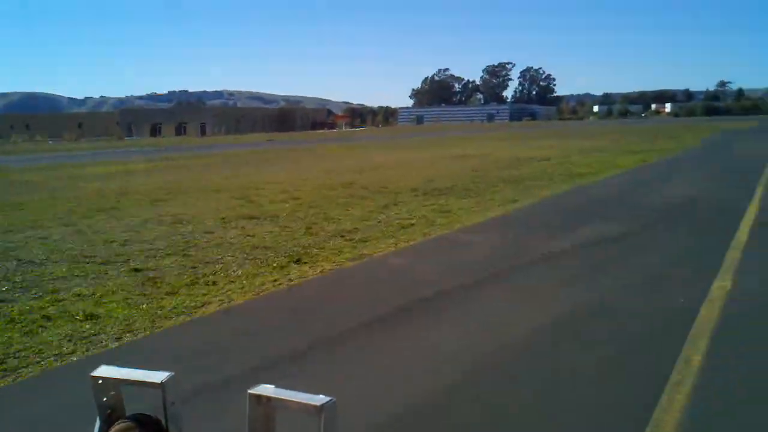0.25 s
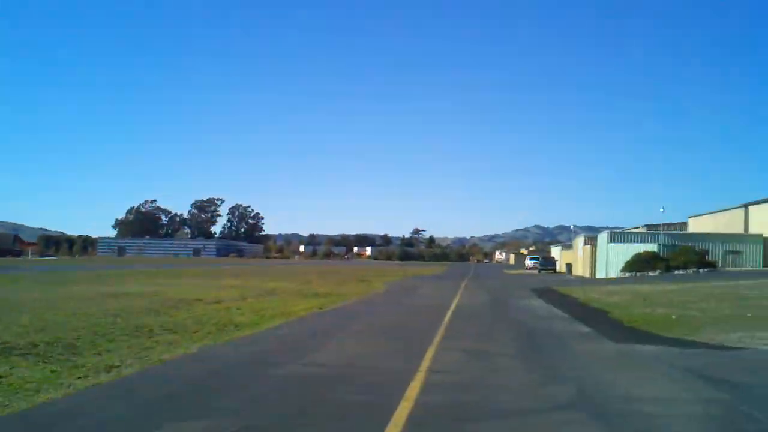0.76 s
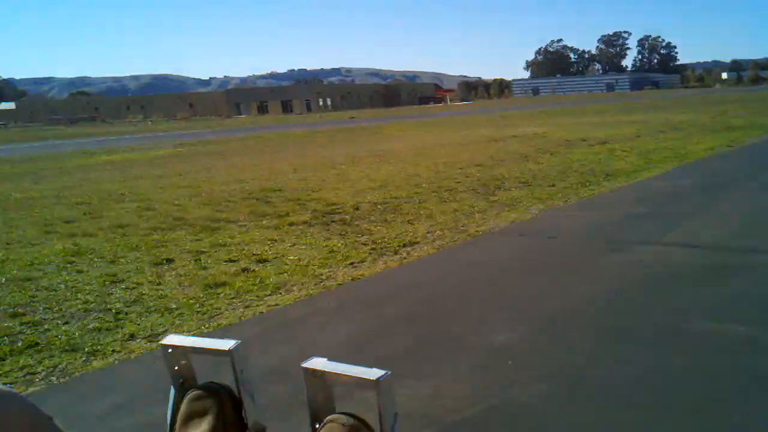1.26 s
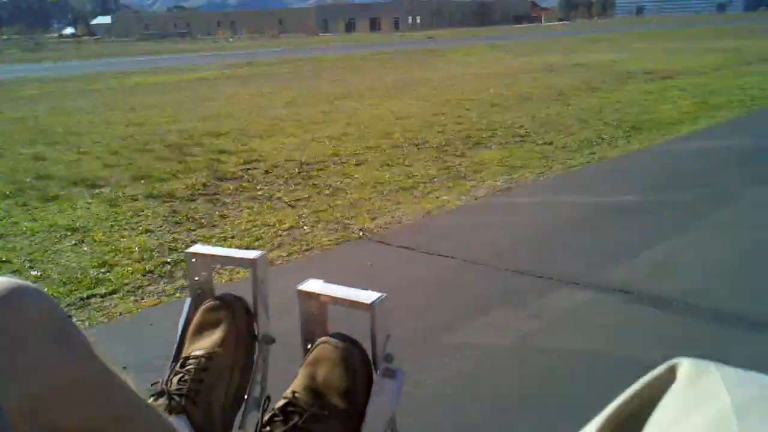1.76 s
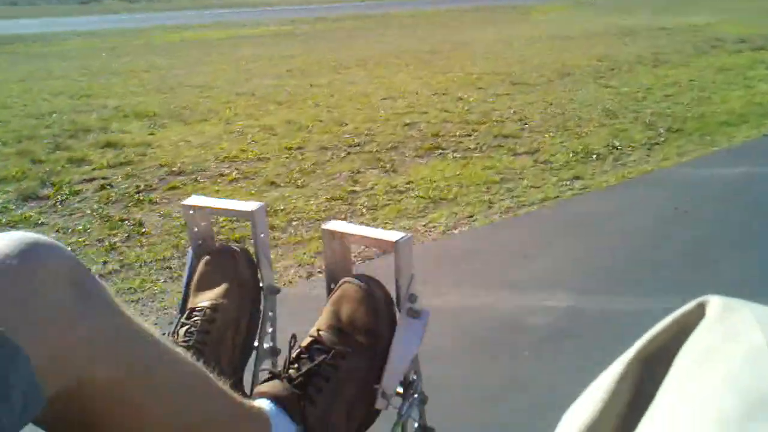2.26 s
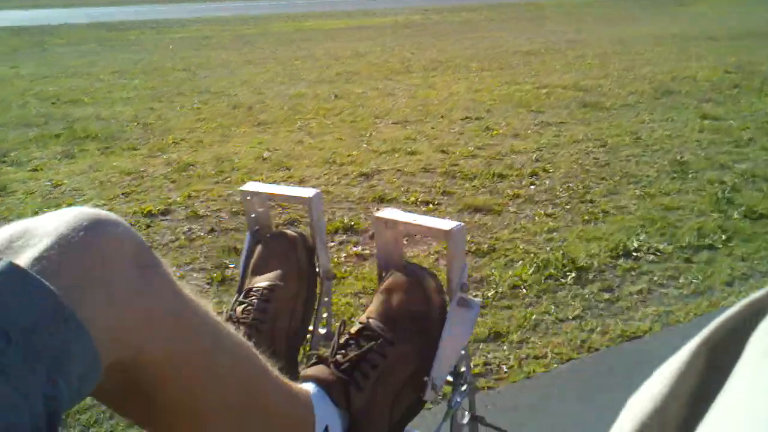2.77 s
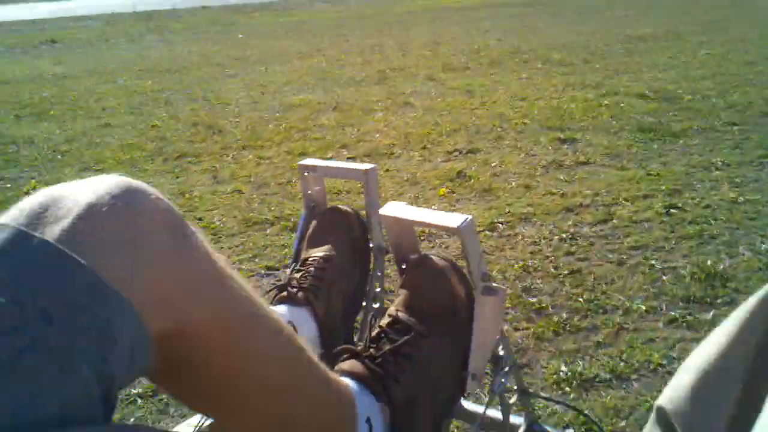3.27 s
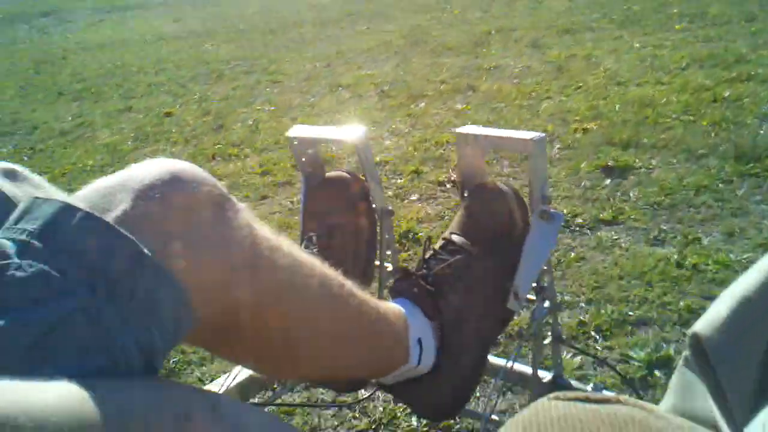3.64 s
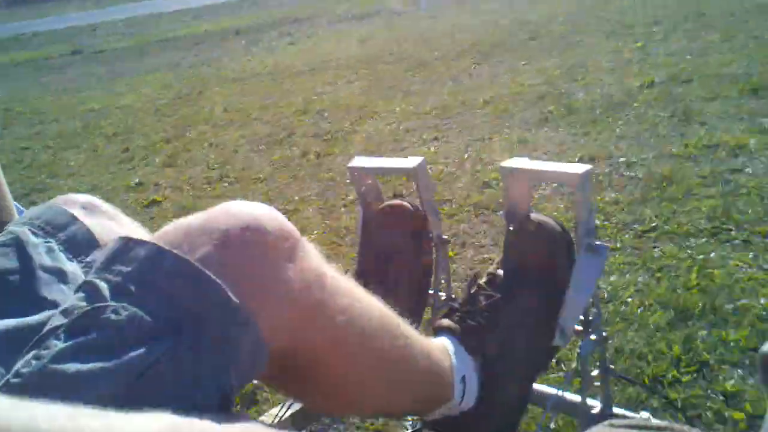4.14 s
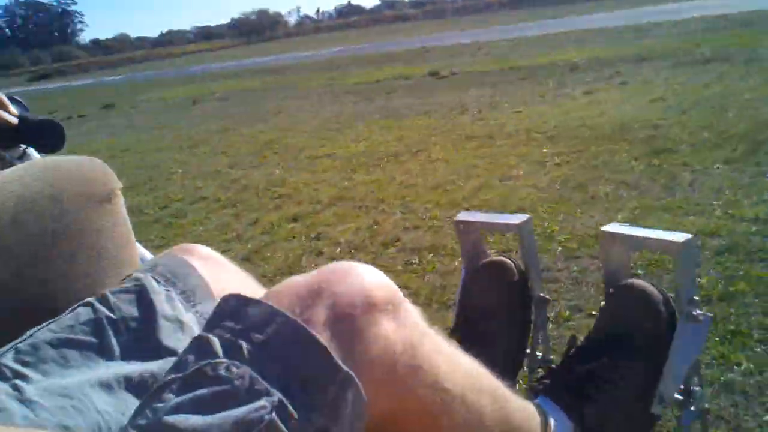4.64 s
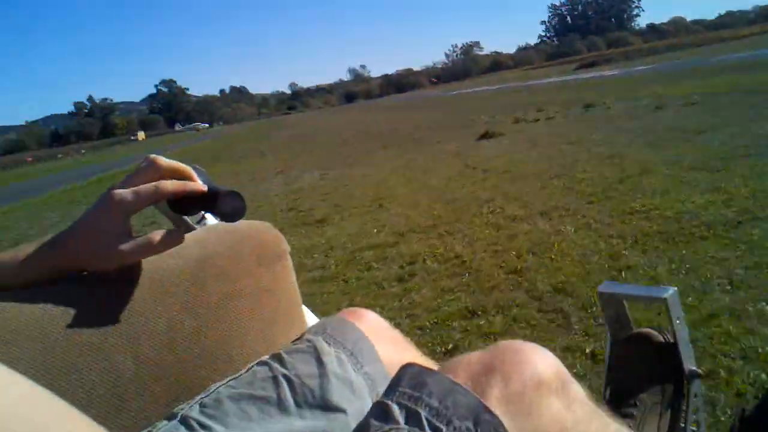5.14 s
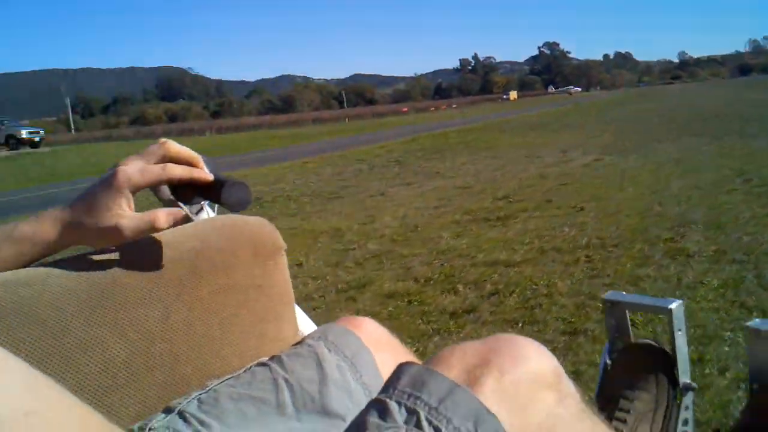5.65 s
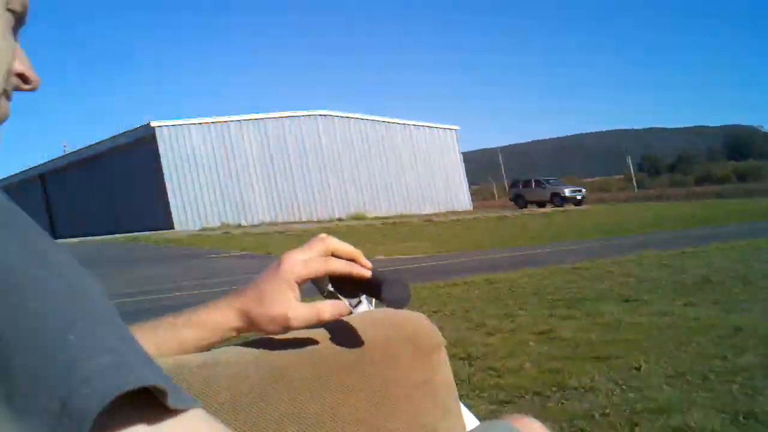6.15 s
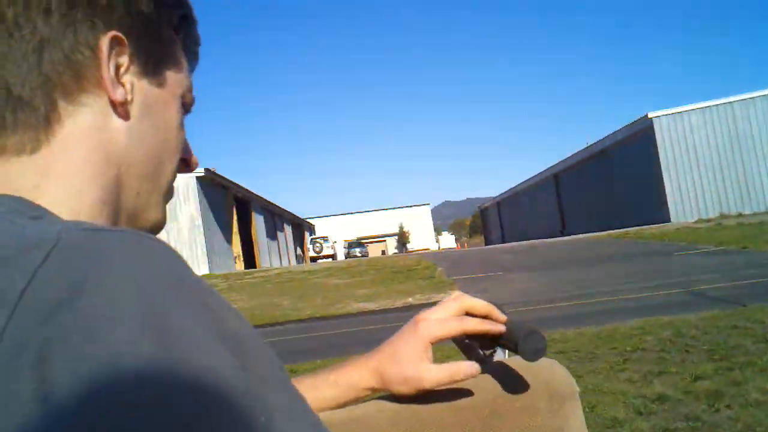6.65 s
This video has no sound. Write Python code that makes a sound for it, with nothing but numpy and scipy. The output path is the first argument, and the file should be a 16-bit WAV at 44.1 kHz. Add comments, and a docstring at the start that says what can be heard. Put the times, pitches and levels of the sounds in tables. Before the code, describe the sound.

Wind buffets and crackles on the microphone while a small electric cart rolls onto grass, its gear whine sinking, with squeaks and metal rattles before stopping.

```python
"""Wind buffets two microphone ports separately, with gusts and snaps, on the seat of a small electric cart.
The cart, with a sofa on it, rolls from tarmac onto grass and slows down: filtered noise makes tyre roar and hiss.
A falling gear-mesh tone whines in swells, harmonic stacks squeak, and short noisy rings rattle.
Left and right are each one port minus the delayed other port."""
import sys
import numpy as np
from scipy import signal
from scipy.fft import rfft, irfft
from scipy.io import wavfile
from scipy.ndimage import uniform_filter1d

SR = 44100
rng = np.random.default_rng(int(sys.argv[2]) if len(sys.argv) > 2 else 0)


def waveform_to_disk(signal):
    """Save audio, clipped to [-1, 1], as 16-bit WAV at the path in sys.argv[1]."""
    frames = np.transpose(np.atleast_2d(signal))
    scaled = np.clip(frames, -1, 1) * 32767
    samples = np.round(scaled).astype(np.int16)
    wavfile.write(sys.argv[1], SR, samples)


N = 304478

# Reference bands of the levels, low and high edge [Hz]
BASS, THUD, MIDS = (90, 380), (150, 600), (650, 2400)
EDGE, TOP, AIR = (2750, 3750), (5500, 13500), (7000, 13000)

# Nominal wind strength over time: time_s, buffeting_db, crackle_port_one_db, crackle_port_two_db
WIND_CURVE = [(0.0, -24.5, -24, -32.5), (0.17, -29.5, -69, -36), (0.28, -23.5, -51, -32.5),
              (0.37, -23, -56, -35.5), (0.45, -21.5, -47, -32.5), (0.6, -23.5, -50, -34.5),
              (0.72, -21, -30.5, -29.5), (1.18, -26, -38, -38), (1.32, -32, -43, -39),
              (1.55, -29.5, -48, -36), (1.9, -26.5, -50, -36), (2.05, -34, -38, -43),
              (2.5, -29.5, -44.5, -39), (2.68, -29, -46, -35.5), (3.02, -26.5, -38.5, -41),
              (3.2, -36, -41, -57), (3.47, -44, -50, -54), (3.62, -25, -37.5, -43), (4.2, -48, -44, -59.5),
              (4.34, -41, -24.5, -42.5), (4.5, -40.5, -44.5, -52), (4.75, -33, -36.5, -54.5),
              (5.02, -26, -44, -46.5), (5.18, -28.5, -34.5, -48), (5.33, -36, -36, -46.5),
              (5.68, -21.5, -40, -55), (5.92, -30.5, -46, -45.5), (6.1, -22.5, -46, -40),
              (6.33, -30, -63, -57.5), (6.55, -22, -61.5, -33), (6.9, -24.5, -63, -32.5)]


def gain_of(db):
    """Level law: decibels become an amplitude factor."""
    return 10 ** (np.asarray(db) / 20)


def evened(x):
    """Normalization of the mean power: x scaled to rms 1."""
    return x / np.sqrt(np.mean(x ** 2) + 1e-20)


def read(points, hz):
    """Spectral envelope in dB, interpolated along a logarithmic frequency axis."""
    f, value = np.transpose(points)
    return np.interp(np.log(hz + 1), np.log(f + 1), value)


def column(table, index):
    """Slow control curve: one column interpolated over time for every sample."""
    rows = np.array(table, float)
    return np.interp(np.arange(N) / SR, rows[:, 0], rows[:, index])


def add(mix, s, sound):
    """Superposition: a sound is added in place from time s [s]."""
    start = max(round(s * SR), 0)
    part = mix[start:][:len(sound)]
    part += sound[:len(part)]


def band_power(shape, hz, band):
    """Mean over all bins of the squared gain that lies inside the band."""
    return np.mean(shape ** 2 * (hz > band[0]) * (hz < band[1]))


def coloured(x, spectrum, band):
    """Linear filtering of white x by a spectral envelope, scaled for rms 1 inside the band."""
    hz = np.fft.rfftfreq(len(x), 1 / SR)
    shape = gain_of(read(spectrum, hz))
    return irfft(rfft(evened(x)) * shape, len(x)) / np.sqrt(band_power(shape, hz, band))


def flicker(per_s):
    """Low-passed random modulation of rms 1, about per_s changes a second, outliers compressed."""
    size = max(int(SR / per_s), 2)
    smooth = uniform_filter1d(rng.standard_normal(N), size)
    smooth = uniform_filter1d(smooth, size)
    return evened(np.tanh(evened(smooth) / 2))


def both_ports(x, lag):
    """Propagation delay: a phase slope makes x reach the second port lag samples later."""
    turn = np.exp(-2j * np.pi * np.fft.rfftfreq(N) * lag)
    return np.array([x, irfft(rfft(x) * turn, N)])


def burst(x, shape):
    """Amplitude windowing: a burst cut out of x with the energy of its shape."""
    return x * shape * np.linalg.norm(shape) / np.linalg.norm(x * shape)


def struck(spectrum, band, size):
    """Minimum-phase response from the folded cepstrum: it rings only after the blow, rms 1 in the band."""
    hz = np.fft.rfftfreq(size, 1 / SR)
    db = read(spectrum, hz)
    folded = irfft(db * np.log(10) / 20, size) * np.where(np.arange(size) < size // 2, 2, 0)
    folded[0] /= 2
    inside = band_power(gain_of(db), hz, band)
    return irfft(np.exp(rfft(folded)), size) * np.sqrt(size / inside)


def wind(port):
    """Turbulent pressure at a port: lumpy low eddies, with crackle of small eddies in clumps."""
    # Spectrum of the large eddies: frequency_hz, level_db
    buffet_tone = [(20, -33.5), (50, -17), (100, -3), (180, -1), (330, -3.5), (550, -10), (900, -36.5),
                   (1500, -46.5), (3000, -100.5), (6000, -100)]
    # Spectrum of the small eddies: frequency_hz, level_db
    crackle_tone = [(30, -50.5), (100, -5.5), (400, 5.5), (800, -3.5), (1400, -13.5), (2200, -22.5),
                    (3400, -37), (4300, -46.5), (5000, -47.5), (14000, -81)]
    lull_db = 2.5 * flicker(13)  # the flow comes and goes
    crackle_db = column(WIND_CURVE, index=2 + port)

    eddies = rng.standard_normal(N) * gain_of(2.5 * flicker(79) + 1.73 * flicker(130))
    buffet = coloured(eddies, buffet_tone, BASS) * gain_of(column(WIND_CURVE, index=1) + lull_db)

    # strong flow breaks into pops; the second port's crackle level rules this at both
    spiky = np.clip((column(WIND_CURVE, index=3) + 50) / 16, .2, 1)
    pops = rng.standard_normal(N) * gain_of(spiky * (5.34 * flicker(55) + 2.2 * flicker(330)))
    crackle = coloured(pops, crackle_tone, MIDS) * gain_of(crackle_db + 1.19 * lull_db - 4.7)
    return buffet + crackle + spiky * knocks(crackle_db + lull_db)


def knocks(level_db):
    """Sparse impulse excitation: sharp pulls of air at random moments, each with a short ring."""
    # Colours of the pulls: ring_hz, ring_db
    knock_rings = [(350, 13), (500, 11), (750, 6.5), (1100, 1.5)]
    per_s, offset_db, spread_db = 140, -6.5, 3.5
    happens = rng.random(N) < per_s / SR
    size = gain_of(spread_db * np.minimum(rng.exponential(1, N), 3)) * happens
    kind = rng.integers(0, len(knock_rings), N)
    out = np.zeros(N)
    for k, (hz, db) in enumerate(knock_rings):
        tone = [(30, -40), (200, -6), (hz * .7, db - 5), (hz, db), (hz * 1.4, db - 9),
                (2300, -22), (3400, -35), (5000, -48), (14000, -75)]
        ring = struck(tone, MIDS, size=2048)[:1024]
        out -= signal.oaconvolve(size * (kind == k), ring)[:N]
    return out / np.sqrt(2048 * np.mean(size ** 2)) * gain_of(level_db + offset_db)


def gusts():
    """Transient turbulence: short noise bursts at one port, whose thump outlasts the sharper edge."""
    # Sharp gusts, nominal levels: time_s, port (0 or 1), level_db, length_scale_s, thump_over_level_db
    gust_rows = [(0.029, 0, -29, 0.0099, 16), (0.247, 1, -36, 0.028, 2), (0.284, 1, -24, 0.077, 11),
                 (0.33, 1, -32, 0.012, 9), (0.355, 1, -38, 0.035, 27), (0.412, 1, -20.5, 0.071, -17),
                 (0.492, 1, -19, 0.018, 0), (0.512, 0, -21, 0.027, -14), (0.559, 1, -29, 0.043, 14),
                 (0.602, 1, -23, 0.021, -9), (0.644, 1, -24.5, 0.0092, 17.5), (0.668, 1, -15.5, 0.023, 10),
                 (0.69, 0, -19, 0.014, 10), (0.691, 1, -14.5, 0.025, -17), (0.753, 1, -16.5, 0.0052, 10.5),
                 (0.777, 1, -26, 0.012, 10), (0.847, 1, -21.5, 0.041, 13), (0.878, 1, -18.5, 0.018, 5),
                 (0.911, 0, -33, 0.0066, 21), (0.954, 1, -23.5, 0.0037, 18.5), (0.976, 1, -20, 0.016, -5),
                 (1.023, 1, -30, 0.057, 17), (1.107, 1, -31, 0.015, 21), (1.122, 0, -25.5, 0.013, 14.5),
                 (1.159, 1, -22, 0.0067, 0), (1.171, 0, -15.5, 0.0092, -8), (1.204, 0, -23, 0.006, 14),
                 (1.409, 1, -27.5, 0.0072, 18), (1.538, 1, -22.5, 0.023, 11.5), (1.674, 1, -27, 0.0047, 18),
                 (1.705, 1, -32.5, 0.014, 20), (1.803, 1, -30, 0.021, 10), (1.91, 1, -25, 0.039, 11.5),
                 (2.163, 1, -27.5, 0.019, 13), (2.193, 1, -27, 0.019, 8), (2.294, 1, -32, 0.017, 13),
                 (2.443, 1, -31, 0.04, 20), (2.662, 1, -30.5, 0.041, 21.5), (2.68, 1, -26, 0.024, 13),
                 (2.792, 1, -41, 0.06, 27), (2.886, 1, -27, 0.029, 9), (2.991, 1, -27, 0.038, 14),
                 (3.022, 1, -30, 0.029, 22), (3.523, 1, -37, 0.0086, 30), (3.96, 1, -36, .05, 11),
                 (4.302, 1, -33, 0.067, 5), (4.37, 1, -36, 0.083, 12), (5.763, 0, -19, 0.014, 10),
                 (5.811, 0, -22, 0.02, 12), (5.842, 0, -21, 0.0034, -11), (5.924, 0, -27.5, 0.0089, 14.5),
                 (6.001, 1, -38.5, 0.018, 23.5), (6.038, 1, -32, 0.015, 12), (6.056, 1, -20, 0.012, 12.5),
                 (6.105, 1, -25, 0.022, 16), (6.134, 1, -28, 0.0085, 16), (6.153, 1, -28.5, 0.014, 22),
                 (6.169, 1, -27, 0.012, -1), (6.195, 1, -27, 0.0022, 23.5), (6.228, 1, -24.5, 0.04, 16),
                 (6.247, 0, -21, 0.012, 4), (6.271, 1, -9, 0.0038, -18), (6.357, 1, -26.5, 0.0045, 21),
                 (6.394, 1, -15.5, 0.0057, -15), (6.417, 1, -26.5, 0.029, 14.5),
                 (6.526, 1, -10.5, 0.0061, 6.5), (6.539, 1, -36, 0.0075, 21),
                 (6.567, 1, -20.5, 0.021, 12.5), (6.605, 1, -18, 0.013, 11), (6.641, 1, -24, 0.013, 10),
                 (6.716, 1, -21, 0.032, 12.5), (6.726, 0, -24.5, 0.032, 7), (6.809, 1, -15.5, 0.012, 9.5),
                 (6.83, 1, -20.5, 0.028, 9.5)]
    rise_s, lead = 0.0017, 0.19  # abrupt onset, this share of the length before the middle
    treble_at_reference_db, brightens = -27, 2.6  # at buffeting of -24.5 dB; dB per dB of buffeting
    thump_tone = [(20, -64.5), (60, -19.5), (200, 14.0), (450, 8.5), (900, -10), (2000, -74.5), (5000, -100)]

    out, t = np.zeros((2, N)), (np.arange(8192) - 1536) / SR
    late = np.maximum(t, 0) / 1.35
    flow_db = column(WIND_CURVE, index=1)
    air = rng.standard_normal((len(gust_rows), 2, len(t)))
    grain = uniform_filter1d(rng.standard_normal((len(gust_rows), len(t))), 60)
    air[:, 0] *= gain_of(3.5 * evened(grain))  # grainy edge
    for (s, port, db, length, thump_db), (edge_air, thump_air) in zip(gust_rows, air):
        treble_db = treble_at_reference_db + brightens * (flow_db[round(s * SR)] + 24.5)
        edge_tone = [(30, -50.5), (300, -12.5), (700, 7.5), (1200, 0.5), (2200, -17.5),
                     (3200, treble_db - 3.5), (4200, treble_db - 15.0),
                     (5000, treble_db - 22.0), (14000, treble_db - 47.5)]
        onset = t + lead * length
        edge_shape = np.clip(onset / rise_s, 0, 1) * np.exp(-(late / (0.56 * length)) ** 2)
        edge = gain_of(-3.5) * burst(coloured(edge_air, edge_tone, MIDS), edge_shape)

        thump_rise = np.clip(onset / (2.7 * rise_s) + 0.47, 0, 1)
        thump_shape = thump_rise * np.exp(-(late / (0.42 * length + 0.0062)) ** 2)
        thump = gain_of(thump_db - 5.5) * burst(coloured(thump_air, thump_tone, THUD), thump_shape)
        add(out[int(port > .5)], s + t[0], gain_of(db) * (edge + thump))
    return out


def snaps():
    """Impulse response of a port cavity: a pull of pressure and trailing turbulence excite a brief ring."""
    # Single snaps of air, nominal levels: time_s, port (0 or 1), treble_db, body_over_treble_db,
    # and in some rows top_brightening_db
    snap_rows = [(0.237, 0, -51, 41), (0.2547, 0, -51, 40), (0.2762, 1, -53, 38), (0.2886, 1, -43, 37.5),
                 (0.3565, 1, -36.5, 28.5), (0.3795, 1, -48, 40), (0.4036, 1, -46, 39),
                 (0.4103, 1, -33, 31, 6), (0.418, 1, -37, 32), (0.4248, 1, -31.5, 26),
                 (0.4348, 1, -43.5, 41), (0.4486, 1, -44, 38), (0.482, 1, -38, 35, 6), (0.487, 0, -41, 29),
                 (0.493, 1, -31, 34, 15), (0.499, 1, -47, 37), (0.5115, 1, -40, 36), (0.52, 1, -34, 7),
                 (0.646, 1, -45, 13), (0.6638, 1, -41.5, 36), (0.674, 1, -44, 21), (0.689, 1, -26, 28, 3),
                 (0.6914, 0, -21, 18, 1), (0.6935, 1, -25, 24, 2), (0.698, 0, -27, 20, 4),
                 (0.704, 1, -38, 34), (0.7226, 1, -38, 27), (0.742, 1, -49, 25), (0.754, 1, -41, 36),
                 (0.779, 1, -47, 42), (0.787, 1, -32.5, 31), (0.792, 1, -40, 9), (0.8494, 1, -45.5, 42),
                 (0.861, 1, -37, 20), (0.8768, 1, -32, 30), (0.8886, 1, -39, 24), (0.9126, 0, -44, 41),
                 (0.9533, 1, -44, 42), (0.9565, 1, -43, 38), (0.9596, 0, -42.5, 34), (0.9803, 1, -48, 36),
                 (1.015, 1, -49, 38), (1.023, 1, -42, 32.5), (1.0988, 1, -45.5, 36), (1.1189, 0, -37, 27),
                 (1.1268, 0, -34.5, 30), (1.136, 1, -40.5, 30), (1.169, 0, -44, 38), (1.176, 0, -39, 33),
                 (1.202, 0, -29, 33, 0), (1.4077, 1, -51, 43), (1.5437, 1, -42.5, 37.5), (1.67, 1, -48, 40),
                 (1.9061, 1, -44, 35), (2.2029, 1, -49, 44), (2.4436, 1, -52, 51), (2.6534, 1, -43, 33.5),
                 (2.6797, 1, -49, 39.5), (2.898, 1, -59, 46), (2.9917, 1, -55, 45), (3.53, 1, -61, 43),
                 (5.7554, 0, -38, 43), (5.808, 0, -40, 42), (5.821, 0, -45, 42), (5.842, 0, -49.5, 42.5),
                 (5.9245, 0, -58, 39), (6.0595, 1, -57, 45), (6.1037, 0, -59, 46), (6.134, 1, -52, 54),
                 (6.159, 1, -57.5, 50), (6.1976, 1, -56, 56), (6.2518, 0, -59, 36), (6.264, 1, -40, 12),
                 (6.273, 1, -19.5, 10, -4), (6.354, 1, -41, 19), (6.36, 1, -37, 8), (6.395, 1, -35, 34, 4),
                 (6.426, 1, -51, 45), (6.509, 0, -47, 1), (6.514, 0, -47, 1), (6.5282, 1, -32, 32, 9),
                 (6.5445, 1, -55, 52), (6.563, 1, -54, 30), (6.5763, 1, -50, 31), (6.6024, 1, -45, 45),
                 (6.6097, 1, -45, 43), (6.635, 1, -43, 31), (6.6436, 1, -46.5, 44), (6.6525, 1, -45, 35),
                 (6.669, 1, -49, 33), (6.7106, 1, -34, 30), (6.7132, 1, -23.5, 20, 4),
                 (6.7193, 1, -24.5, 23), (6.741, 1, -40.5, 33), (6.7507, 1, -35, 30), (6.7696, 1, -43, 30),
                 (6.786, 1, -33, 26), (6.7939, 1, -29.5, 24), (6.798, 1, -47, 41), (6.811, 1, -48, 15),
                 (6.823, 1, -31, 30), (6.8344, 1, -29, 15), (6.8429, 1, -41, 34), (6.8587, 1, -22, 18.5),
                 (6.8704, 1, -35, 25)]
    top_at_reference_db, dulls = -24, .15  # for a treble of -31 dB; dB lost per dB of treble
    grain, grain_s = 0.19, 0.0011  # share and decay time of the trailing turbulence
    out, t = np.zeros((2, N)), np.arange(2048) / SR
    energy_scale = np.sqrt(0.0012 * SR / len(t))  # energy of 1.2 ms at the nominal level
    air = rng.standard_normal((len(snap_rows), 128))
    for (s, port, db, body_db, *bright_db), turbulence in zip(snap_rows, air):
        top_db = top_at_reference_db - dulls * (db + 31.0) + sum(bright_db)
        tone = [(30, body_db - 41.5), (200, body_db - 9.5), (500, body_db - 5), (1000, body_db - 5.5),
                (1900, body_db - 14.5), (3200, 5), (3800, -3), (4400, -11),
                (5500, top_db - 4), (8000, top_db - 10.0), (14000, top_db - 20.5)]
        push = grain * turbulence * np.exp(-t[:128] / grain_s)
        push[0] = -1  # the flow sucks at the port
        push /= np.linalg.norm(push)
        snap = np.convolve(struck(tone, EDGE, size=2048)[:1024], push)
        add(out[int(port > .5)], s - .0004, gain_of(db - 2.5) * energy_scale * snap)
    return out


def rolling():
    """Partial coherence: roar from under the seat is partly alike at both ports, rumble fully, hiss not."""
    # Nominal strength over time: time_s, tyre_and_drive_roar_db, grass_and_air_hiss_db
    rolling_curve = [(0.0, -50.5, -83), (0.75, -47, -82.5), (1.3, -48.5, -77), (3.0, -46.5, -78.5),
                     (3.5, -45, -78.5), (3.9, -43.5, -79), (4.4, -41.5, -74.5), (4.7, -42.5, -76.5),
                     (5.2, -41, -74.5), (5.65, -39.5, -72), (5.9, -50, -83.5), (6.9, -55, -92.5)]
    # Spectrum of the roar: frequency_hz, level_db
    roar_tone = [(30, -42.5), (200, 13.5), (500, -3), (900, 8), (1250, 4), (1600, -2), (2150, -5.5),
                 (2700, -6), (3500, -21), (4300, -27), (5000, -33), (7500, -54.5), (9000, -81)]
    # Resonances of the frame in the roar: ring_hz, width_hz, boost_db
    frame_rings = [(1262, 14, 9.5), (2184, 140, 9), (3600, 68, 5), (6520, 60, 1.5)]
    # Spectrum of the rumble: frequency_hz, level_db
    rumble_tone = [(20, -45), (50, -11), (100, 7.5), (200, 14.5), (400, 9.5), (700, -4), (1200, -60),
                   (4000, -88)]
    # Spectrum of the hiss: frequency_hz, level_db
    hiss_tone = [(2000, 3), (4500, 3.5), (6500, 2), (7800, -5), (11000, -1), (14000, 0)]

    bumps = gain_of(column(rolling_curve, index=1) + 1.2 * flicker(5.2) + 1.4 * flicker(51))
    hz = np.fft.rfftfreq(N, 1 / SR)
    rings = 1 + sum((gain_of(db) - 1) / (1 + (2 * (hz - f) / width) ** 2) for f, width, db in frame_rings)

    def roar_noise():
        """Resonant filtering: bumpy noise coloured by the frame."""
        rough = coloured(rng.standard_normal(N), roar_tone, MIDS) * bumps
        return irfft(rfft(rough) * rings, N)

    alike = .7  # amplitude share common to both ports
    common = both_ports(roar_noise(), lag=11.55)
    separate = np.array([roar_noise(), roar_noise()])
    roar = alike * common + np.sqrt(1 - alike ** 2) * separate
    rumble = coloured(rng.standard_normal(N), rumble_tone, BASS) * bumps * gain_of(13 + 2.2 * flicker(22))
    hiss = np.array([coloured(rng.standard_normal(N), hiss_tone, AIR) for _ in range(2)])
    hiss_db = column(rolling_curve, index=2) + 0.9 * flicker(25) + 0.92 * flicker(7)
    return roar + rumble + hiss * gain_of(hiss_db)


def whine():
    """Gear-mesh tone by phase integration: it falls as the cart slows, roughened by the teeth."""
    # Gear mesh, before modulation: time_s, pitch_hz, steady_level_db
    mesh_curve = [(0.9, 560, -60), (1.3, 543, -52), (2.3, 499, -45), (2.8, 479, -46), (3.3, 458, -52),
                  (3.7, 443, -52), (4.0, 426, -58), (4.4, 400, -58), (5.3, 346.4, -55), (5.75, 311, -60)]
    # Swells about once a wheel turn, nominal levels: start_s, length_s, level_db, octave_level_db
    swell_rows = [(1.016, 0.3, -38, -55), (1.335, 0.33, -35, -57), (1.688, 0.21, -29, -56),
                  (1.937, 0.31, -29.5, -60), (2.242, 0.4, -31, -45), (2.63, 0.24, -31.5, -47.5),
                  (2.924, 0.26, -29.5, -51.5), (3.179, 0.2, -29.5, -47), (3.49, 0.24, -33.5, -45),
                  (3.749, 0.068, -33, -65), (3.894, 0.19, -25, -53), (4.277, 0.15, -22.5, -53),
                  (4.524, 0.085, -31, -60), (4.856, 0.17, -39, -50), (5.215, 0.12, -28, -58),
                  (5.524, 0.12, -27, -56)]
    swell_edge, climb_hz = 0.35, 2.5  # exponent (0 = square, large = pointed); rise within a swell
    low = gain_of(column(mesh_curve, index=2))
    octave, climb = np.zeros((2, N))
    for s, length, db, octave_db in swell_rows:
        along = np.arange(0, length, 1 / SR) / length
        swell = np.sin(np.pi * along) ** swell_edge
        add(low, s, gain_of(db) * swell)
        add(octave, s, gain_of(octave_db) * swell)
        add(climb, s, climb_hz * (along - .5))
    hz = column(mesh_curve, index=1) + climb + 5.9 * flicker(40) + 1.5 * flicker(7.2)
    turn = 2 * np.pi * np.cumsum(hz) / SR
    slip = .7 * flicker(70)  # phase wander of the octave, rms .7 radians
    tone = low * np.sin(turn) + octave * gain_of(1.8 * flicker(60)) * np.sin(2 * turn + slip)
    breakup = gain_of(2.6 * flicker(51) - 1.26)
    return both_ports(np.sqrt(2) * tone * breakup, lag=0.62)


def squeaks():
    """Stick-slip in a frame joint: a short harmonic stack scoops up to pitch, its overtones fading first."""
    # Squeaks, nominal levels: start_s, attack_s, length_s, level_db, overtones_db
    squeak_rows = [(2.71, 0.05, 0.112, -34.5, 10), (4.078, 0.019, 0.044, -42, -8),
                   (4.136, .015, 0.135, -27, 0.5), (5.333, 0.011, 0.024, -44, -1),
                   (5.417, 0.0087, 0.025, -42, -3)]
    # Harmonics: multiple of the fundamental, level_db
    squeak_tone = [(1, 1), (2, -27), (3, -21), (4, -48), (5, -44)]
    pitch_hz, scoop, scoop_of_attack = 2175, .11, .55  # start lower by a share; time as share of attack
    release, overtone_fade_db = 0.43, 8  # last share of the length; extra loss by the end
    out, waver, rasp = np.zeros(N), flicker(380), flicker(90)
    for s, attack, length, db, over_db in squeak_rows:
        t = np.arange(0, length, 1 / SR)
        hz = pitch_hz * (1 - scoop * np.exp(-t / (scoop_of_attack * attack)))
        turn = 2 * np.pi * np.cumsum(hz * (1 + .008 * waver[:len(t)])) / SR
        stack = np.zeros(len(t))
        for multiple, tone_db in squeak_tone:
            rough_db = 3.3 * rasp[round(multiple * SR):][:len(t)]  # a different stretch for each harmonic
            overtone_db = over_db + rough_db - overtone_fade_db * (t / length) ** 2
            harmonic_db = tone_db + (multiple > 1.5) * overtone_db
            stack += gain_of(harmonic_db) * np.sin(round(multiple) * turn)
        shape = np.minimum(t / attack, 1) * np.minimum((length - t) / (release * length), 1)
        add(out, s, stack * gain_of(db) * shape ** 2.2)
    return both_ports(out, lag=3.95)


def rattles():
    """Impact response of loose metal: a noise tick, a blurred ring and a duller knock decay together."""
    # Hits of loose metal parts, nominal levels: time_s, level_db, part (row of the next table)
    rattle_rows = [(3.5039, -50, 1), (3.7754, -51, 1), (3.9594, -47, 1), (4.262, -40, 4), (4.279, -44, 4),
                   (4.3221, -54, 0), (4.327, -39, 4), (4.352, -44, 4), (4.3994, -41, 4), (4.415, -45, 4),
                   (4.7894, -48, 1), (5.1347, -52, 1), (5.2485, -56, 0), (5.3657, -66, 0), (5.389, -51, 0),
                   (5.418, -53, 0), (5.5036, -51, 0), (5.592, -44.5, 0), (5.621, -49.5, 0), (3.915, -36, 3),
                   (3.935, -41, 3), (4.02, -41, 3), (4.2622, -38, 3), (4.3235, -27, 3), (4.343, -36, 3),
                   (4.3679, -36, 3), (4.372, -42, 4), (4.3984, -36, 3), (4.4692, -41, 3), (4.4967, -42, 3),
                   (4.5261, -35, 3), (4.7366, -41, 3), (4.8573, -42, 3), (4.9536, -41, 3), (5.01, -38, 3),
                   (5.1362, -35, 3), (5.2484, -35, 3), (5.3886, -33, 3), (5.462, -36, 3), (5.478, -56, 0),
                   (5.5069, -36, 3), (5.5912, -31, 3), (5.6196, -33, 3), (5.636, -56, 0)]
    # Parts, nominal levels: ring_hz, knock_over_hit_db, tick_over_hit_db, ring_blur_hz
    part_rows = [(7200, 28.5, -15, 1800), (11800, 4, -15, 1800), (2190, 22, -15, 1800),
                 (2130, -10, -45, 140), (3600, 2, -28, 450)]
    t60_s = 0.043
    tick_tone = [(3000, -20), (5500, 0), (8000, 0), (14000, -6)]
    knock_tone = [(800, -16.5), (2100, 13.5), (3500, 20.5), (4600, -3.0), (8000, -31.0)]
    out, t = np.zeros(N), np.arange(4000) / SR
    rows = list(rattle_rows) + shakes()
    air = rng.standard_normal((len(rows), 3, 4000))
    for (s, db, part), (tick_air, ring_air, knock_air) in zip(rows, air):
        hz, knock_db, tick_db, blur_hz = part_rows[round(part)]
        tick = coloured(tick_air, tick_tone, TOP) * gain_of(tick_db)
        blur = evened(uniform_filter1d(ring_air, round(SR / blur_hz)))
        ring = np.sin(2 * np.pi * hz * t) * blur * gain_of(-7.0)
        knock = coloured(knock_air, knock_tone, EDGE) * gain_of(knock_db - 9.0)
        decay = gain_of(db - 60 * t / t60_s) * np.minimum(t / 0.0027, 1)
        add(out, s, decay * (tick + ring + knock))
    return both_ports(out, lag=6.33)


def shakes():
    """Random point process: many small hits of one part on the grass, as rows for rattles()."""
    # Strength of the shaking over time, before random spread: time_s, level_db
    shaking_curve = [(3.4, -80.5), (4.22, -72), (4.26, -58), (4.33, -59), (4.44, -70), (4.6, -72.5),
                     (5.4, -62.5), (5.75, -79.5)]
    count, spread_db = 130, 6
    when, size = rng.random((count, 2)).T
    s, db = np.transpose(shaking_curve)
    when = s[0] + when * (s[-1] - s[0])
    level_db = np.interp(when, s, db) - spread_db * np.log(size + 0.028)
    return [(moment, level, 2) for moment, level in zip(when, level_db)]


def scene():
    """Superposition of the pressures at the two microphone ports."""
    air = np.array([wind(0), wind(1)]) + gusts() + snaps()
    return air + rolling() + whine() + squeaks() + rattles()


def record(dry):
    """Pressure-gradient pickup: one port minus the delayed other, then overload, noise and band limit."""
    port_lag, edge_hz, circuit_db = 17, 13900, -69  # samples; low-pass edge; noise of the two amplifiers
    delayed = np.roll(dry[::-1], port_lag, axis=1)
    sides = np.clip(dry - 0.86 * delayed, -1, 1)
    sides += gain_of(circuit_db) * rng.standard_normal(dry.shape)
    sides *= np.minimum(np.arange(N) / (.003 * SR), 1)  # starts without a step
    band = signal.firwin(511, edge_hz, window=("kaiser", 9), fs=SR)
    return np.clip(signal.oaconvolve(sides, band[None], "same"), -1, 1)


dry = scene()
out = record(dry)
waveform_to_disk(out)
```